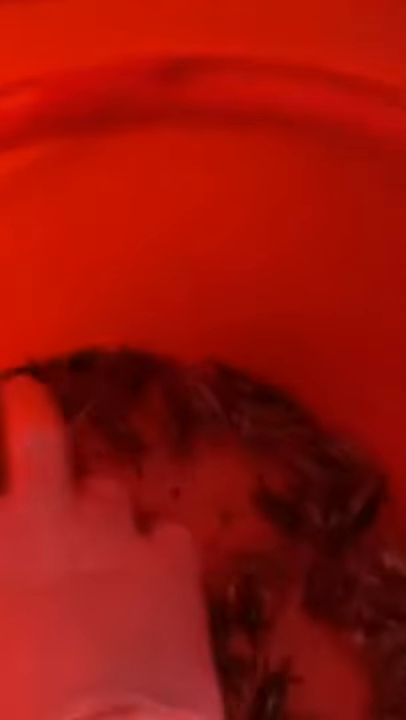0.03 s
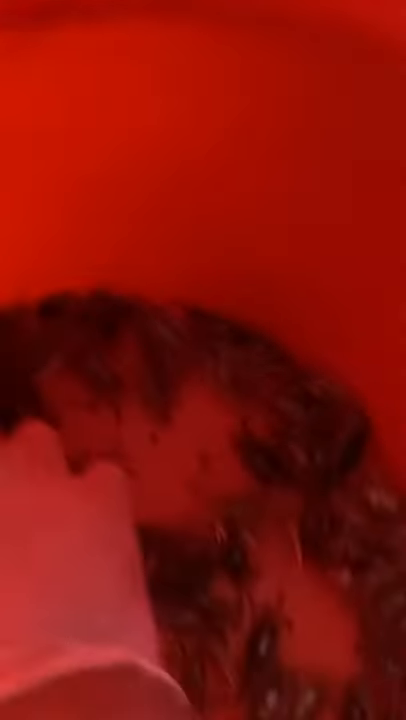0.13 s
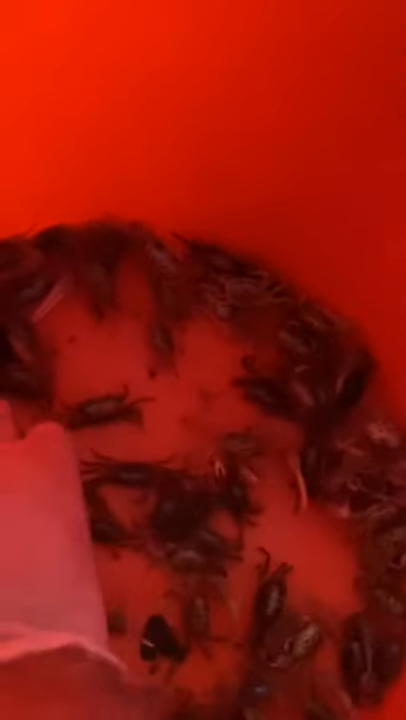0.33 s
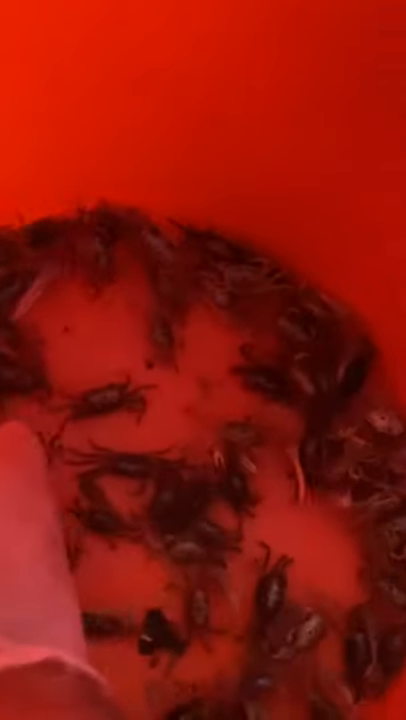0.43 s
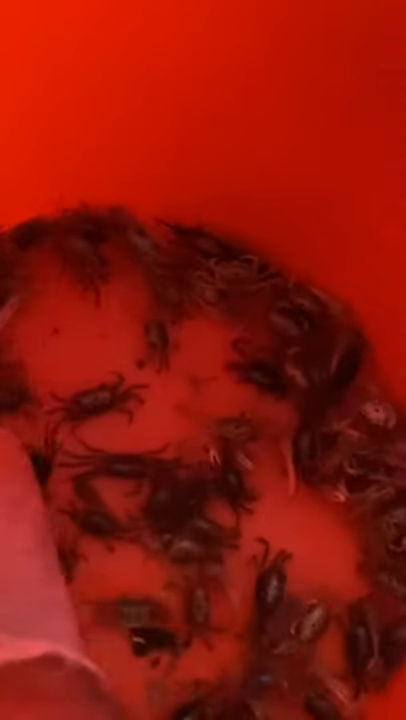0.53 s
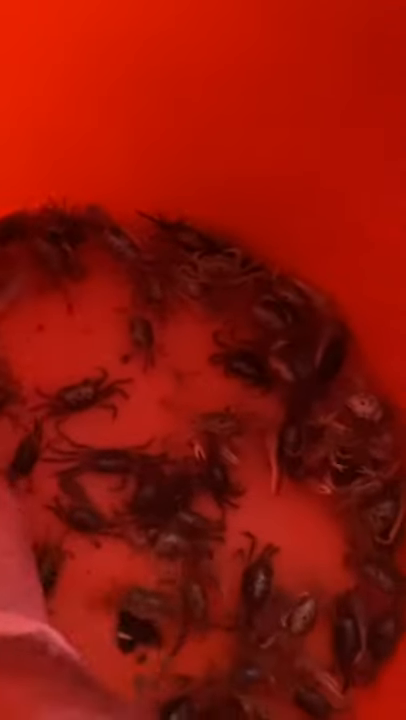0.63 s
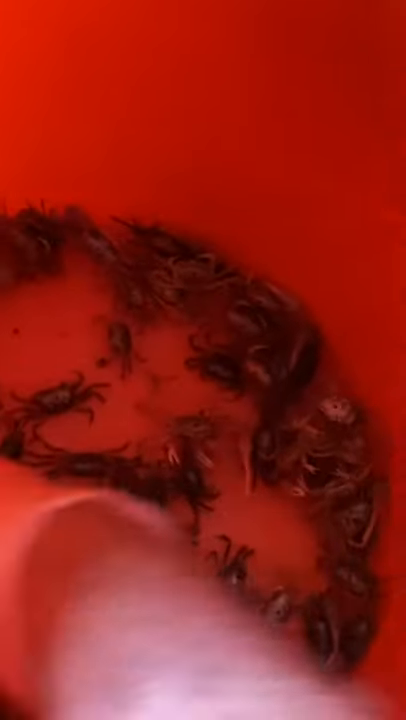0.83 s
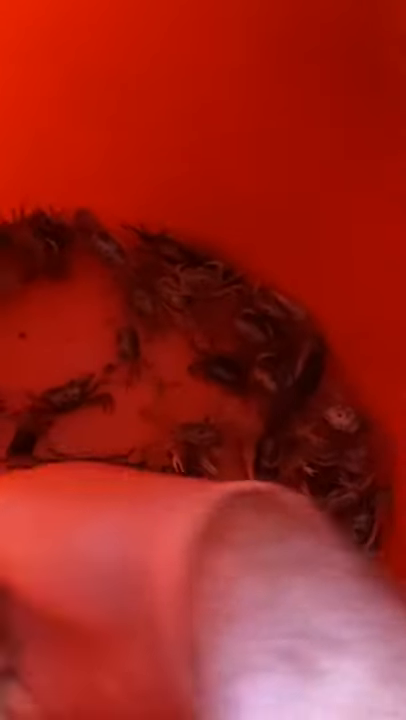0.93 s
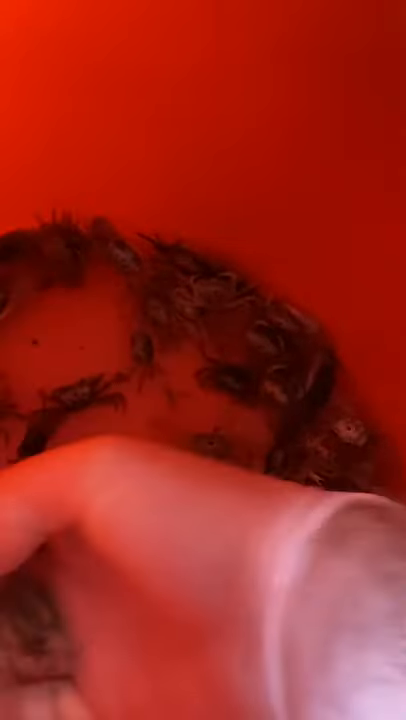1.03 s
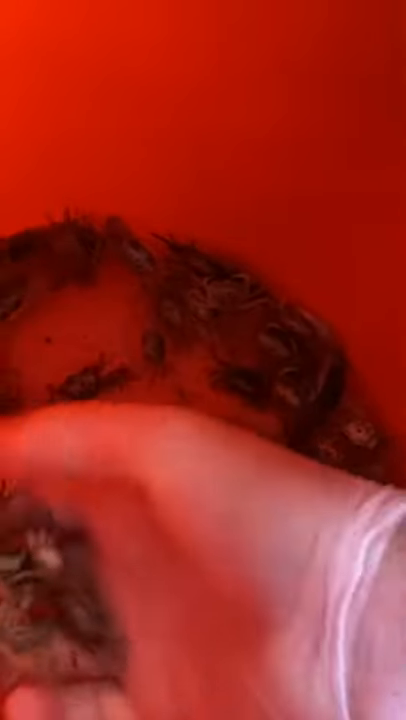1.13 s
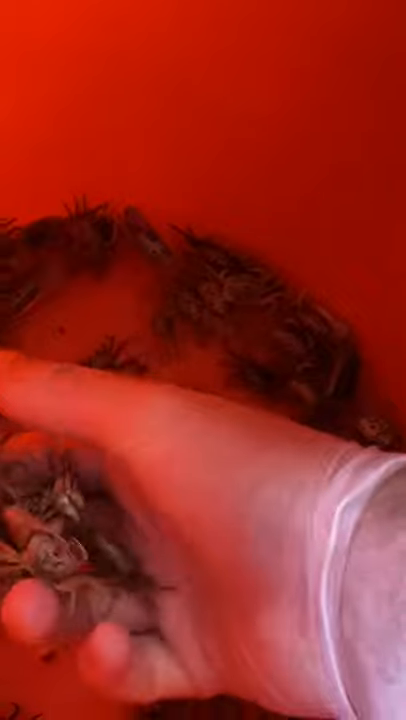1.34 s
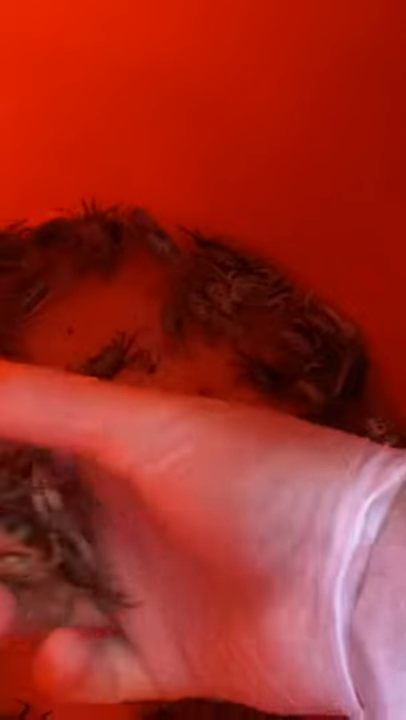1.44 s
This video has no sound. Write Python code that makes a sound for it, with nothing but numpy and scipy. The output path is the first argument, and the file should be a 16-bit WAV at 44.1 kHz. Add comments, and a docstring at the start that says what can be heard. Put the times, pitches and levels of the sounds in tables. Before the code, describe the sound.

Crab legs tick and wet shells fizz inside a plastic bucket, heard up close over faint room hum. A scooping hand brings dull thuds and louder scraping, then things settle before one sharp knock and some last clicks.

```python
"""Small crabs in a plastic bucket, close to a phone's two microphone ports, over faint room noise and hum.
From the start legs tick in the hollow, wet shells fizz and bodies knock on the plastic. A gloved hand
stirs and scoops some up: the thin wall thuds, and the scrabble swells to a rasping peak near 0.55 s.
After a lull, a sharp knock and a spit of fizz come near 1.2 s, then a last few clicks of shell on shell."""
import sys
import numpy as np
from scipy import signal
from scipy.fft import rfft, irfft
from scipy.io import wavfile
from scipy.ndimage import uniform_filter1d

SR = 44100
rng = np.random.default_rng(int(sys.argv[2]) if len(sys.argv) > 2 else 0)


def store_wav(level_fs):
    """Save 16-bit WAV to argv[1]."""
    pcm = np.round(np.clip(np.atleast_2d(level_fs), -1, 1) * 32767)
    wavfile.write(sys.argv[1], SR, pcm.T.astype(np.int16))


N = 66150


def undb(db):
    """Decibels to gain."""
    return 10 ** (np.asarray(db) / 20)


def unit(x):
    """Scale to rms 1."""
    return x / np.sqrt(np.mean(x ** 2))


def clock():
    """Time of each sample, in seconds."""
    return np.arange(N) / SR


def age():
    """Time since a contact, over a quarter second."""
    return np.arange(SR // 4) / SR


def curve(rows):
    """Gain along (t/s, level/dB) points."""
    return undb(np.interp(clock(), *np.array(rows).T))


def colour(x, rows):
    """Causal filter of unit energy, shaped by (f/Hz, level/dB) points."""
    hz, db = np.array(rows).T
    size = 4096
    bins_hz = np.arange(size // 2 + 1) * SR / size
    gain = undb(np.interp(np.log(bins_hz + 1), np.log(hz), db))
    cepstrum = irfft(np.log(gain))
    cepstrum[1:size // 2] *= 2  # fold to minimum phase
    cepstrum[size // 2 + 1:] = 0
    response = irfft(np.exp(rfft(cepstrum)))
    return signal.fftconvolve(x, response / np.linalg.norm(response))[:len(x)]


def fade(t60):
    """Exponential decay from 1."""
    return np.exp(-np.log(1000) * age() / max(t60, 1e-3))


def swell(rise):
    """Envelope that grows to 1 in its rise time and dies away."""
    u = age() / max(rise, 1e-3)
    return (u * np.exp(1 - u)) ** 2


def burst(t60):
    """Decaying noise of random signs: the chatter of one contact."""
    return np.sign(rng.standard_normal(len(age()))) * fade(t60)


def ticks(per_s, scatter_db):
    """Random impulses, many small and a few large, rms 1."""
    when, size, side = rng.random((3, N))
    strength = np.minimum(-np.log(1 - size), 4)
    impulses = (when < per_s / SR) * np.sign(side - .5)
    return unit(impulses * undb(scatter_db * strength) / np.sqrt(per_s))


def add(out, start, x):
    """Mix a sound in at its time."""
    i = max(int(start * SR), 0)
    out[i:i + len(x)] += x[:N - i]


# mains hum: f/Hz, rms level/dB
HUM_TONES = [(60, -62.5), (120, -61), (300, -63.5), (360, -67.5)]
# room tone: f/Hz, relative level/dB
ROOM_SPECTRUM = [(20, -39), (60, -19), (130, -2.5), (330, -5), (650, -10), (850, -26), (1700, -16.5),
                 (4000, -25), (8000, -28), (16000, -31)]

def room():
    """Steady noise and mains hum in the room around the bucket."""
    hum = sum(np.sqrt(2) * undb(db) * np.sin(2 * np.pi * (hz * clock() + rng.random()))
              for hz, db in HUM_TONES)
    return hum + undb(-52) * colour(rng.standard_normal(N), ROOM_SPECTRUM)


def flurries(per_s, spread_db):
    """A gain that jumps about as single crabs start and stop."""
    held = int(SR / per_s)
    steps = rng.standard_normal(N)[np.arange(N) // held]
    return unit(undb(spread_db * uniform_filter1d(steps, held // 2)))


# legs in the stirred heap: t/s, level/dB
LEG_LEVEL = [(0, -55), (.04, -50.5), (.1, -55), (.16, -49.5), (.2, -48.5), (.3, -44), (.36, -42),
             (.43, -44), (.49, -38.5), (.55, -36.5), (.6, -45), (.67, -49.5), (.74, -50.5), (.92, -49),
             (1.13, -49.5), (1.165, -51.5), (1.215, -43), (1.27, -53), (1.35, -48), (1.39, -57),
             (1.46, -52), (1.5, -54.5)]
# leg ticks from close by: f/Hz, relative level/dB
LEG_SPECTRUM = [(200, -20), (600, 0), (1200, -1.5), (1900, 0.5), (2700, -2), (4000, -6.5), (5500, -15.5),
                (7500, -26.5), (16000, -22)]

def legs():
    """Countless legs tick on shells, denser and louder the harder the hand stirs."""
    stirring = curve(LEG_LEVEL)
    crowding = unit(stirring) ** .7
    rustle = colour(ticks(per_s=2800 * crowding, scatter_db=1.5), LEG_SPECTRUM)
    return rustle * flurries(per_s=55, spread_db=1.8) * stirring


# wet fizz: t/s, level/dB
FIZZ_LEVEL = [(0, -65.5), (.04, -51), (.14, -50.5), (.22, -57.5), (.3, -51.5), (.42, -47.5), (.53, -43),
              (.585, -45), (.63, -53.5), (.78, -55), (.835, -51), (.95, -55.5), (1.13, -58), (1.172, -62),
              (1.19, -38), (1.212, -67), (1.28, -60), (1.35, -59), (1.4, -70), (1.5, -66)]
# its bright hiss: f/Hz, relative level/dB
FIZZ_SPECTRUM = [(1500, -23.5), (4500, 9), (7000, 6.5), (10500, 3.5), (13000, 2), (16000, -0.5)]

def fizz():
    """Wet shells and joints fizz with tiny dense ticks."""
    return colour(ticks(per_s=2800, scatter_db=1), FIZZ_SPECTRUM) * curve(FIZZ_LEVEL)


# the bucket's modes, before each tap scales them: f/Hz, level/dB, t60/s
BUCKET_MODES = [(555.8, -2, 0.086), (607, -15.5, 0.08), (710, -20, 0.082), (923.5, -7, 0.11),
                (1000, -4.5, 0.061), (1438, -14.5, 0.095), (1610, -15, 0.065), (2023, -14.5, 0.042),
                (2580, -14.5, 0.037), (2900, -16, 0.051), (4650, -23, 0.059)]

def ring(pitch, length, tilt_db):
    """The bucket answers a tap; a soft tap tilts the upper modes down. Little radiates below the lowest."""
    modes = 0
    for hz, db, t60 in BUCKET_MODES:
        octaves = np.log2(hz / BUCKET_MODES[0][0])
        tone = np.sin(2 * np.pi * hz * pitch * age())
        modes += undb(db + tilt_db * octaves) * fade(t60 * length) * tone
    low_cut = signal.butter(6, 439 * pitch, "high", fs=SR, output="sos")
    attack = 1 - fade(0.0062)
    return signal.sosfilt(low_cut, modes * attack)


# shells dragging on the plastic: t/s, level/dB
DRAG_LEVEL = [(0, -56.5), (.16, -48.5), (.2, -42), (.24, -44.5), (.31, -37.5), (.38, -47.5), (.44, -40.5),
              (.55, -36), (.605, -47), (.65, -41.5), (.69, -53.5), (.76, -54.5), (.87, -54), (1.15, -55),
              (1.5, -56.5)]
# spots where they drag: pitch factor
SPOT_PITCHES = [1.0, 1.09, 1.179, 1.3]

def drag():
    """Dragged bodies keep the plastic ringing with small taps."""
    out = np.zeros(N)
    for pitch in SPOT_PITCHES:
        taps = ticks(per_s=120, scatter_db=3)
        out += signal.fftconvolve(taps, ring(pitch, length=0.32, tilt_db=-3))[:N]
    return unit(out) * curve(DRAG_LEVEL)


# pushes on the wall: t/s, peak level/dB, starting f/Hz, rise/s, pitch fall/(octaves per s)
WALL_THUDS = [(0.021, -44, 58, 0.012, -2), (0.043, -44, 203, 0.025, 0), (0.215, -22.5, 65, 0.014, 2),
              (0.2491, -18, 176, 0.0093, 55), (0.249, -32, 332, 0.0062, 20), (.278, -24, 107, 0.0098, 13),
              (0.297, -19.5, 264.4, 0.014, 48.5), (.297, -30, 422, 0.0054, 14), (.33, -31, 129, .01, 34),
              (0.372, -25.5, 112, 0.0083, 0), (0.457, -24.5, 206, 0.023, 0), (0.482, -26.5, 71, 0.013, -2),
              (0.622, -29.5, 61.3, 0.015, -2.5), (0.624, -36.5, 210, 0.013, -0.5),
              (0.66, -31.5, 81, 0.0079, 0), (0.731, -41.5, 108, 0.0096, -2), (0.863, -47.5, 63, 0.016, 0),
              (1.183, -34.5, 211, 0.018, 1)]
# handling rumble: t/s, level/dB
RUMBLE_LEVEL = [(0, -50), (.1, -49.5), (.19, -43), (.235, -37), (.32, -31), (.36, -38), (.42, -39),
                (.5, -36), (.59, -41), (.66, -42), (.72, -48), (.79, -52), (.96, -88), (1.2, -57),
                (1.5, -57)]
# its bass from close by: f/Hz, relative level/dB
RUMBLE_SPECTRUM = [(15, -17), (35, -6.5), (55, 0.5), (95, 0.5), (160, -1), (260, -9.5), (400, -18.5),
                   (800, -43.5)]

def wall(slack_hz=45):
    """The hand flexes the thin wall: it rumbles and thuds, and hard pushes fall in pitch as it relaxes."""
    out = np.zeros(N)
    for start, db, hz, rise, fall in WALL_THUDS:
        glide_hz = np.maximum(hz * 2 ** (-fall * age()), slack_hz)
        add(out, start, undb(db) * swell(rise) * np.sin(2 * np.pi * np.cumsum(glide_hz) / SR))
    return out + colour(rng.standard_normal(N), RUMBLE_SPECTRUM) * curve(RUMBLE_LEVEL)


def resonate(x, hz, width):
    """One broad, steep-sided resonance of a shell; width is relative to its centre."""
    b, a = signal.iirpeak(min(hz, SR / 3), 1 / np.clip(width, .1, 1.2), fs=SR)
    return signal.lfilter(b, a, signal.lfilter(b, a, x))


# snap of a hard contact: f/Hz, relative level/dB
SNAP_SPECTRUM = [(300, -35), (1500, -7.5), (3300, 11), (5000, 7), (6500, 3.5), (8500, 3), (16000, -11)]

def contact(t60, hz, width, snap_db):
    """A shell strikes: short chatter through one broad resonance, with a bright snap."""
    chatter = burst(t60)
    body = resonate(chatter, hz, width)
    body *= np.linalg.norm(chatter) / np.linalg.norm(body)
    return body + undb(snap_db) * colour(chatter, SNAP_SPECTRUM)


# bodies on the plastic: t/s, ring gain/dB, pitch factor, length factor, tilt/(dB per octave),
# crack level/dB, crack f/Hz, relative crack width
BODY_KNOCKS = [(0.025, -42, 1.2, 0.37, -15, -42, 1210, 0.7), (.064, -22.5, 1.14, 0.34, -11, -34, 1100, 1.2),
               (.187, -29, 1.2, 0.48, -9, -36, 910, 0.61), (.228, -32, 1.22, .4, -1, -36, 990, 0.62),
               (.3, -33, 1.3, 0.35, -11, -30, 1610, .9), (0.5268, -26, 1.1, 0.58, -12, -23.5, 1790, 0.59),
               (.548, -23.5, 1.17, 0.68, -18, -38, 760, 1.3),
               (0.6195, -16.5, 1.19, 0.39, -19, -26.5, 840, 0.52),
               (.657, -28, 1.15, 0.43, -15, -40, 790, 1),
               (0.7053, -29.5, 0.99, 0.28, 1.5, -29.5, 1100, 0.57),
               (.8558, -30.5, 1.04, 0.4, 1, -33.5, 1020, 0.44),
               (1.179, -15, 1.038, 0.73, 0, -25.5, 990, 0.52), (1.1898, -22, 1.05, 0.62, -8, -36, 1040, .5)]

def knocks(crack_t60=0.018):
    """A crab hits the plastic: a short crack and the bucket's ring."""
    out = np.zeros(N)
    for start, ring_db, pitch, length, tilt_db, crack_db, hz, width in BODY_KNOCKS:
        crack = undb(crack_db) * contact(crack_t60, hz, width, snap_db=-15)
        add(out, start, crack + undb(ring_db) * ring(pitch, length, tilt_db))
    return out


# shells clicking together: t/s, level/dB, f/Hz, t60/s
SHELL_CLICKS = [(0.045, -53, 4200, .015), (0.297, -16.5, 2470, 0.0046), (0.2971, -33.5, 4700, 0.02),
                (.621, -32.5, 1620, 0.017), (.705, -38, 2080, .012), (.972, -42, 2860, 0.019),
                (1.0472, -41.5, 11300, 0.014), (1.1788, -21, 2400, 0.014), (1.1807, -34, 4940, 0.0065),
                (1.1913, -30.5, 2600, 0.012), (1.191, -40, 5000, 0.014), (1.3228, -32.5, 2000, 0.022),
                (1.3432, -36.5, 2300, 0.031), (1.374, -36, 2060, 0.013), (1.4314, -35.5, 1880, 0.023),
                (1.445, -41.5, 2120, 0.021)]

def clicks():
    """Shell on shell: a hard contact with no ring of the bucket."""
    out = np.zeros(N)
    for start, db, hz, t60 in SHELL_CLICKS:
        add(out, start, undb(db) * contact(t60, hz, width=0.87, snap_db=-11.5))
    return out


# shells sliding in the heap: t/s, peak level/dB, f/Hz, rise/s
SHELL_SCRAPES = [(.468, -37.5, 1900, 0.011), (.522, -35.5, 2300, 0.019), (.658, -41, 1980, 0.011),
                 (.915, -46.5, 2290, .009), (1.001, -49, 2400, 0.0066), (1.087, -50, 2180, 0.0059),
                 (1.204, -44.5, 1920, 0.0085)]

def scrapes():
    """Pushed shells slide over each other: contacts so dense that they merge into a swelling rasp."""
    out = np.zeros(N)
    for start, db, hz, rise in SHELL_SCRAPES:
        rasp = unit(resonate(rng.standard_normal(len(age())), hz, width=0.61))
        add(out, start, undb(db) * swell(rise) * rasp)
    return out


def hollow(x, t60):
    """Dense short reflections between the bucket's walls."""
    response = burst(t60) * (1 - fade(0.027))
    return signal.fftconvolve(x, response / np.linalg.norm(response))[:N]


# reflections that reach each port separately: f/Hz, relative level/dB
REFLECTION_SPECTRUM = [(30, -10), (100, -0.5), (300, 4.5), (550, 9), (1000, -0.5), (2200, 9), (5000, 0.5),
                       (16000, -2.5)]

def scene():
    """The bucket at close range: both ports hear the same sound, each with faint reflections of its own."""
    crabs = legs() + fizz() + drag() + knocks() + clicks() + scrapes()
    shared = room() + crabs + undb(-12) * hollow(crabs, t60=0.079) + wall()
    reflected = colour(shared, REFLECTION_SPECTRUM)
    return shared + undb(-19) * np.array([hollow(reflected, t60=0.019) for port in range(2)])


# lead of the left microphone port over the right: f/Hz, phase/rad
LEFT_PORT_LEAD = [(0, 0), (500, .16), (1200, 0), (2500, .2), (3700, .05), (5200, .55), (6300, 1.9),
                  (7300, 3.14), (8800, 4.4), (9800, 6.2), (10800, 6.3), (12000, 7.7), (13300, 9.3),
                  (14100, 9.5), (16000, 12)]

def record(dry, top_hz=15900):
    """A phone close to the bucket: its two ports hear the treble out of step, and the top is cut."""
    hz = np.arange(N + 1) * SR / (2 * N)
    lead = np.interp(hz, *np.array(LEFT_PORT_LEAD).T)
    phase_shift = np.exp(.5j * np.array([lead, -lead]))
    ports = irfft(rfft(dry, 2 * N) * phase_shift)[:, :N]
    high_cut = signal.ellip(10, .2, 80, top_hz, fs=SR, output="sos")
    return signal.sosfilt(high_cut, ports)


dry = scene()
out = record(dry)
store_wav(out)
```